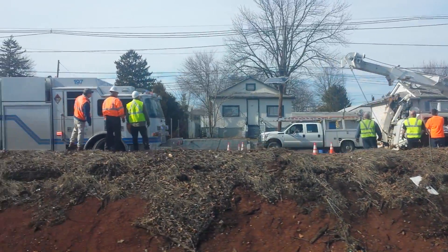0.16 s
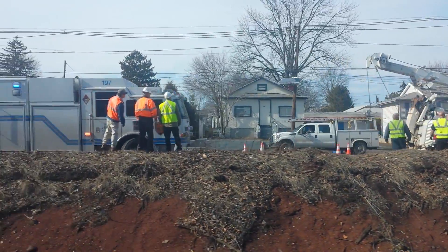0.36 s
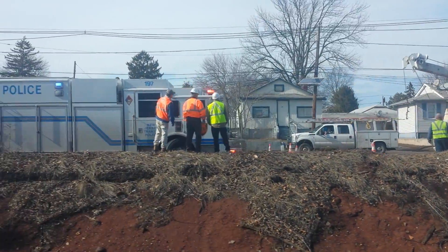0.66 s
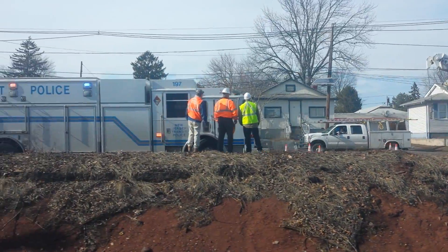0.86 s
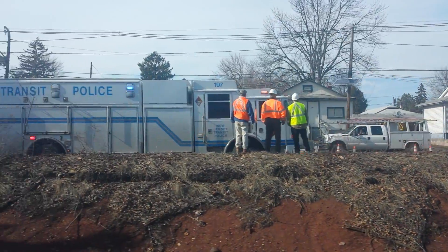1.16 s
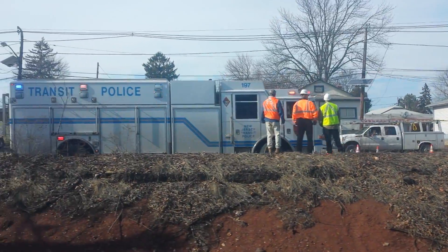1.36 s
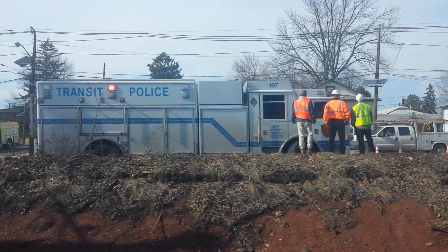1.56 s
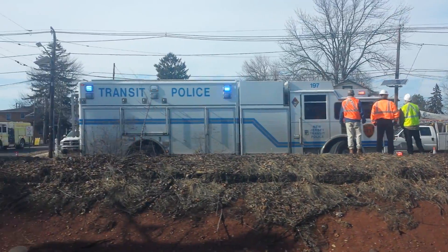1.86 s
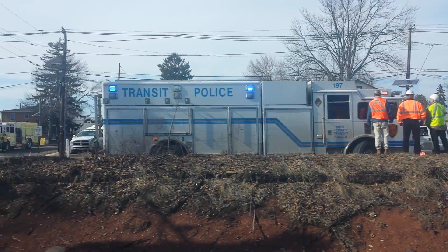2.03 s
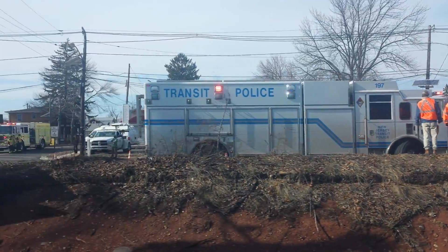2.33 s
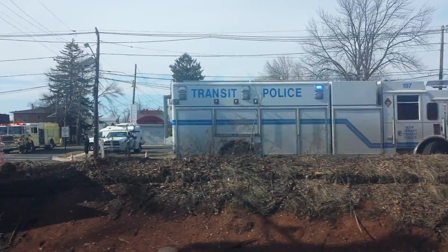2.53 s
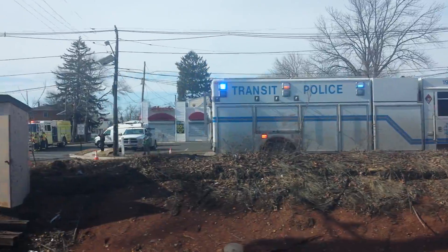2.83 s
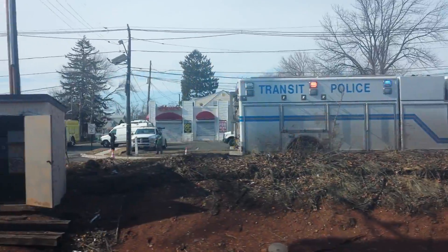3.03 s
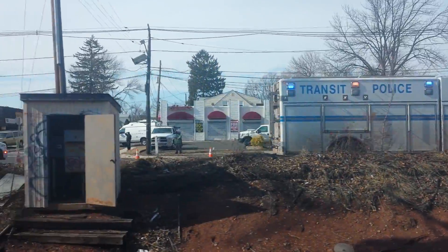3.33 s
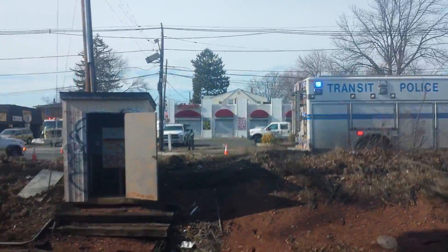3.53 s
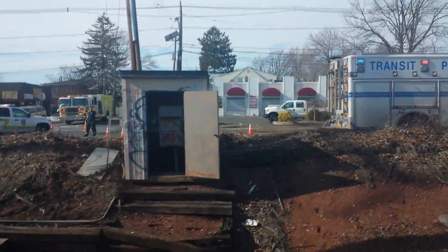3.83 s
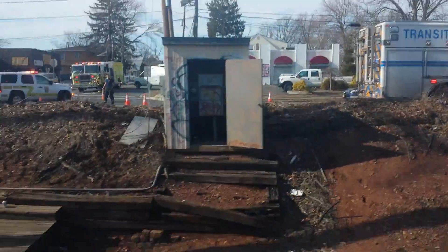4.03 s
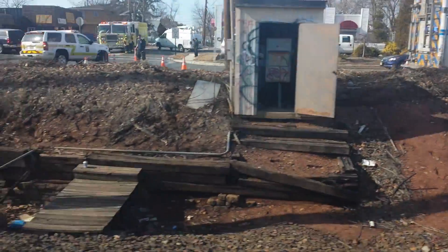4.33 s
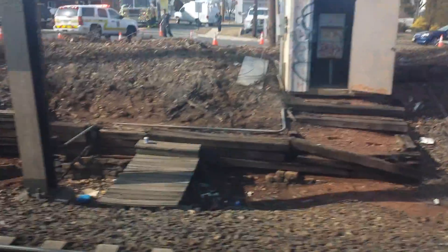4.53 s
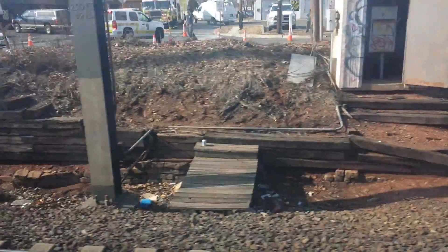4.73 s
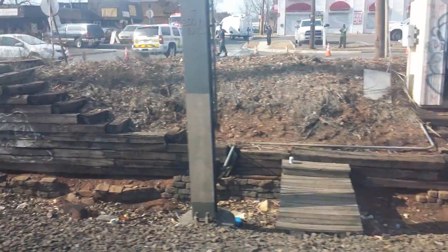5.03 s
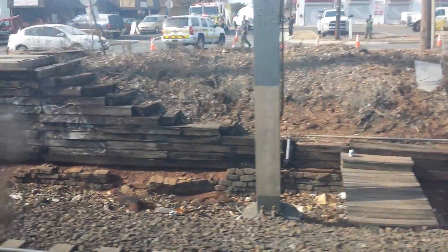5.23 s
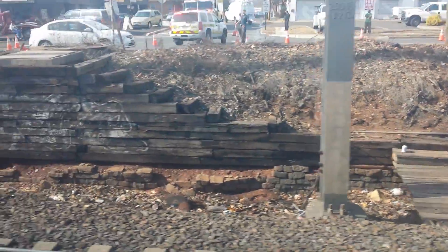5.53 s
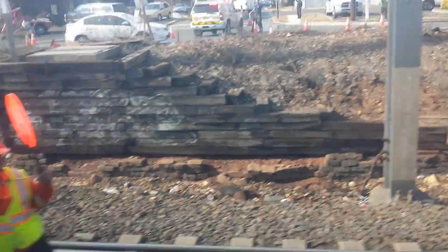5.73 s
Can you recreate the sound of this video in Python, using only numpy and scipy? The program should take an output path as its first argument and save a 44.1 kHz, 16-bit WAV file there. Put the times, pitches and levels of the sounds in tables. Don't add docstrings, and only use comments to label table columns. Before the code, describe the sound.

Deep train-car rumble and droning electrical hum, interrupted by loud phone-case clicks and rubs, the background sinking sharply then returning.

```python
import sys
import numpy as np
from scipy import signal
from scipy.fft import rfft, irfft, next_fast_len
from scipy.io import wavfile
from scipy.ndimage import uniform_filter1d, minimum_filter1d, map_coordinates

SR = 44100
rng = np.random.default_rng(int(sys.argv[2]) if len(sys.argv) > 2 else 0)


def volts_from_db(level):
    exponent = np.asarray(level, float) / 20
    return 10 ** exponent


def transcribe(signal):
    frames = np.atleast_2d(signal).T
    limited = np.clip(frames, -1, 1)
    pcm = np.round(limited * 32767).astype(np.int16)
    wavfile.write(sys.argv[1], SR, pcm)


N = 259292


def unit(x):
    return x / np.sqrt(np.mean(x ** 2) + 1e-20)


def along(points, hz):
    f, v = np.transpose(points)
    return np.interp(np.log(hz + 1), np.log(f + 1), v)


def curve(points):
    s, v = np.transpose(points)
    return np.interp(np.arange(N) / SR, s, v)


def wobble(rate_hz):
    coarse = np.arange(0, N + 64, 64)
    knots = rng.standard_normal(int(N * rate_hz / SR) + 4)
    return np.interp(np.arange(N), coarse, map_coordinates(knots, [coarse * rate_hz / SR]))


def filtered(x, response):
    n = x.shape[-1]
    m = next_fast_len(n + 8192)
    return irfft(rfft(x, m) * response(np.fft.rfftfreq(m, 1 / SR)), m)[..., :n]


def resonances(modes):
    def response(f):
        total = 0
        for k, (center_hz, width_hz, db) in enumerate(modes):
            damping = 1j * f * width_hz
            total = total + (-1) ** k * volts_from_db(db) * damping / (center_hz * center_hz - f * f + damping)
        return total
    return response


def sides(pan_db):
    return volts_from_db([pan_db / 2, -pan_db / 2])


def add(out, start_s, x):
    part = out[:, round(start_s * SR):][:, :x.shape[1]]
    part += x[:, :part.shape[1]]


def turned():
    # time_s, second_grip_share
    turn_points = [(2.5, 0.039), (2.9, 0.57)]
    return np.clip(curve(turn_points), 0, 1)


def gripped(x):
    # freq_hz, left_minus_right_db
    grip_a = [(92, 1.5), (210, 2.5), (420, 4.5), (770, -10.5), (1170, -7), (2740, 4), (6410, 14),
              (11000, -3)]
    # freq_hz, left_minus_right_db
    grip_b = [(60, 2), (160, 4.5), (270, 2), (740, 2.5), (1220, 24), (3330, -3), (5500, 1.5), (12000, -8)]
    first = filtered(x, lambda hz: sides(along(grip_a, hz)))
    second = filtered(x, lambda hz: sides(along(grip_b, hz)))
    return first + turned() * (second - first)


def rush(response, patchy_db):
    # freq_hz, left_right_likeness
    likeness = [(20, 0.9), (120, 1), (240, 0.87), (480, 0.64), (950, 0.6), (1890, 0.41), (3770, -0.02),
                (15000, 0.0)]
    z = signal.stft(rng.standard_normal((2, N)), nperseg=512)[2]
    field = uniform_filter1d(rng.standard_normal(z.shape[1:]), size=6, axis=0)
    field = uniform_filter1d(field, size=12, axis=1)
    pair = signal.istft(z * volts_from_db(patchy_db * unit(field)), nperseg=512)[1][:, :N]

    def mid_side(hz):
        angle = np.arccos(np.clip(along(likeness, hz), -1, 1)) / 2
        return response(hz) * [np.cos(angle), np.sin(angle)]

    mid, side = filtered(pair, mid_side)
    return unit(np.array([mid + side, mid - side]))


def car():
    # time_s, car_level_db
    gain_points = [(0, -21.5), (1.45, -21.5), (2.595, -20.5), (2.63, -29), (2.7, -28), (2.8, -33.5),
                   (3, -35.5), (3.2, -38), (3.33, -40.5), (3.6, -34.5), (4.1, -37.5), (4.4, -34.5),
                   (4.7, -35), (4.9, -32.5), (5.1, -26), (5.3, -26), (5.88, -24.5)]
    full_db = -22
    duck_db = curve(gain_points) - full_db
    low_db, second_db = jolts()
    noise = body(1.054 * duck_db + 0.31 * low_db) + roar(duck_db) + vent(duck_db)
    return volts_from_db(full_db) * gripped(noise) + hum(0.9 * duck_db, low_db, second_db)


def jolts():
    # peak_s, lowest_swell_db, second_swell_db
    bumps = [(0.02, 6.5, 3), (.2, 7.5, 9.5), (.39, 5, 3.5), (.59, -1.5, 6.5), (.72, 4.5, 1.5),
             (.96, 4, 12.5), (1.05, -3.5, 5), (1.18, 6.5, -3.5), (1.36, 5, 11.5), (1.5, 4, 5),
             (1.62, 2.5, 11.5), (1.88, -2, 0), (2.1, -1.5, 5.5), (2.18, 0, 1.5), (2.36, -4, 9.5),
             (2.47, 2.5, 6), (2.95, 1, 6), (3.13, 10.5, 4), (3.65, -15, 5.5), (4.09, 3, -7), (4.29, 5, 3.5),
             (4.55, 4, 0), (4.78, 2, 3), (4.91, 7, 8), (5.03, 3.5, -0.5), (5.11, 4.5, 8.5), (5.47, 8.5, 3),
             (5.57, 1.5, 1), (5.65, 8, 8.5), (5.86, -3, 6.5)]
    s, *swells_db = np.transpose(bumps)
    coarse = np.arange(0, N + 64, 64) / SR
    swells = []
    for db, width_s in zip(swells_db, (0.077, 0.025)):
        bells = np.exp(-0.5 * ((coarse - s[:, None]) / width_s) ** 2)
        swells.append(np.interp(np.arange(N) / SR, coarse, db @ bells))
    return swells


def body(level_db):
    # freq_hz, width_hz, level_db
    body_modes = [(57.4, 23, -11), (87, 9.8, -2.5), (117, 16.2, -4.5), (137.3, 17.6, -2), (160, 14, -16),
                  (206.6, 23, -10.5), (224.2, 32, -16), (298.6, 16, -17), (477, 8.5, -15.5),
                  (532.6, 6, -13)]
    # freq_hz, density_db
    rumble_spectrum = [(13, -30), (24, 2.5), (40, -4.5), (113, 1.5), (191, -4), (278, -15), (367, -23),
                       (880, -120)]
    ringing = volts_from_db(-4.0) * rush(resonances(body_modes), patchy_db=0.65)
    rumble = volts_from_db(-5.5) * rush(lambda hz: volts_from_db(along(rumble_spectrum, hz)), patchy_db=0.4)
    return volts_from_db(level_db) * (ringing + rumble)


def roar(level_db):
    # freq_hz, density_db
    roar_spectrum = [(150, -11), (260, -2), (500, -3), (1300, -15), (1900, -14), (2300, -19), (3500, -21.5),
                     (4500, -47)]
    return volts_from_db(level_db - 10.5) * rush(lambda hz: volts_from_db(along(roar_spectrum, hz)), patchy_db=0.63)


def hum(gain_db, low_db, second_db):
    multiples = [1, 2, 3, 4, 5, 6, 8, 12, 13, 14, 18, 20, 24, 27, 28, 30]
    # grip1_left_db, grip1_right_db, grip2_left_db, grip2_right_db
    levels_db = [(-30, -30, -37, -37.5), (-28, -29.5, -26.5, -27), (-32.5, -34, -32.5, -32),
                 (-40.5, -41.5, -39.5, -40.5), (-42.5, -48, -54, -61), (-46, -36.5, -38, -47.5),
                 (-41, -53.5, -40.5, -43), (-40.5, -33, -47, -49.5), (-51, -38.5, -45, -44.5),
                 (-40.5, -52.5, -45.5, -46), (-51.5, -66, -47, -47), (-34, -32.5, -42, -33.5),
                 (-51, -42.5, -44, -45), (-57, -47, -34, -48), (-51.5, -49, -34.5, -43),
                 (-41, -40.5, -38.5, -49)]
    faint_multiples = [32, 34, 36, 39, 42, 44, 45, 59, 61]
    # freq_hz, left_lead_rad
    lead_a = [(60, -0.3), (180, -0.22), (300, -.5), (480, 0.1), (720, -2), (800, 3), (1200, 1), (1800, 2)]
    # freq_hz, left_lead_rad
    lead_b = [(60, 0.2), (180, -.35), (360, -0.1), (480, .5), (720, -1), (800, 0.9), (1200, 1), (1800, 2.5)]
    mains_hz = 60.09
    out, turn = np.zeros((2, N)), turned()
    phase = 2 * np.pi * mains_hz * np.arange(N) / SR
    shaken_db = {1: low_db, 2: second_db, 3: (low_db - second_db) / 2}
    faint_db = []
    for k in faint_multiples:
        fall_db = 0.42 * (k - faint_multiples[0])
        faint_db.append(-57.5 - fall_db + 7.5 * rng.standard_normal(4))
    for k, grips_db in zip([*multiples, *faint_multiples], [*levels_db, *faint_db]):
        left1, right1, left2, right2 = grips_db
        ports_db = np.array([left1 + turn * (left2 - left1), right1 + turn * (right2 - right1)])
        first_lead, second_lead = along(lead_a, k * mains_hz), along(lead_b, k * mains_hz)
        lead = first_lead + turn * (second_lead - first_lead)
        sway = 12 / (k + 4)
        start = rng.uniform(0, 2 * np.pi) + 0.28 * sway * wobble(8)
        if k in shaken_db:
            swell_db = shaken_db[k] + (2 if k == 1 else 2.5) * wobble(17)
        else:
            swell_db = sway * wobble(4.5)
        tone = np.sin(k * phase + start + [lead, 0 * lead])
        out += np.sqrt(2) * volts_from_db(ports_db + gain_db + swell_db) * tone
    return out


def vent(level_db):
    # freq_hz, density_db
    vent_spectrum = [(2500, -44), (3800, -0.5), (5000, -1.5), (6300, 1.5), (7500, -4), (9000, -7),
                     (11000, -16), (16000, -42)]
    waver_db = 0.55 * wobble(2.38)
    return volts_from_db(level_db + waver_db - 22.5) * rush(lambda hz: volts_from_db(along(vent_spectrum, hz)), patchy_db=0.94)


def clicks():
    # start_s, peak_db, left_minus_right_db, shell_knock_db, shell_edge_db
    snaps = [(2.591, -16, -14, -21, -9), (2.6412, -2.5, 12, -19, -11.5), (2.6587, -19.5, -12, -14.5, -20),
             (2.734, -18, -2, -17, -24), (2.7364, -18, 0, -16, -22), (2.8388, -11, -7, -19, -22),
             (2.859, -14, -31, -23, -15), (2.9818, -14, -12.5, -14, -15), (3.307, -7.5, -10, -21, -4.5),
             (3.464, -8, -17, -25.5, -28), (3.6015, -17, -11, -20.5, -21), (3.9539, -14, -14, -21.5, -15),
             (4.004, -22, 1, -9, -13), (4.043, -8, -13, -32, -12), (5.1001, -3.5, 1.5, -20, -12),
             (5.1421, -18, -5, -8.5, -23), (5.3092, -9.5, -22, -24, -17), (5.6364, -19, -12, -17.5, -18.5)]
    # start_s, peak_db, left_minus_right_db, shell_knock_db
    ticks = [(2.6759, -20.5, -16, -14.5), (2.771, -33.5, -6, -16), (2.825, -30.5, -2, -9),
             (2.8638, -36, -4, -11), (3.1088, -33.5, 7, -20), (3.4659, -22, 6, -16), (3.965, -36, -6, -9),
             (3.991, -40, -4, -3), (4.098, -32, -17, -16), (4.6182, -44, -11, -1), (4.6933, -43, 16, -12),
             (4.712, -38, -8, -3.5), (5.1745, -26.5, -1, -13), (5.4914, -45, 1, -6)]
    # freq_hz, width_hz, level_db
    ports = [
        [(6000, 3100, -1.5), (8000, 3650, -1)],
        [(5870, 3800, 2.5), (10530, 780, -4)],
    ]
    # freq_hz, width_hz, level_db
    shell_modes = [(1310, 1750, 0), (2680, 1720, 0), (11200, 8900, 0)]
    tick_edge_db = -9
    out, t = np.zeros((2, N)), np.arange(1024) / SR
    for start_s, db, pan_db, knock_db, edge_db in [*snaps, *[(*tick, tick_edge_db) for tick in ticks]]:
        burst = 0.36 * rng.standard_normal((2, len(t))) * volts_from_db(-60 * t / 0.0044)
        burst[:, 0] = 1.33
        cavities = []
        for side, port in zip(burst, ports):
            cavities.append(filtered(filtered(side, resonances(port)), resonances(port)))
        parts = [np.array(cavities)]
        for mode in shell_modes:
            parts.append(filtered(filtered(burst, resonances([mode])), resonances([mode])))
        parts_db = [-7, knock_db - 0.5, knock_db - 1, edge_db]
        snap = sum(volts_from_db(d) * p / np.abs(p).max(1, keepdims=True) for d, p in zip(parts_db, parts))
        pan = sides(pan_db)
        add(out, start_s + 0.0005, volts_from_db(db + 9) * (pan / pan.mean())[:, None] * snap)
    return out


def pop():
    # start_s, level_db, pitch_hz, left_minus_right_db
    unstickings = [
        (2.83705, -4.5, 900, -14),
    ]
    out, t = np.zeros((2, N)), np.arange(512) / SR
    for start_s, db, hz, pan_db in unstickings:
        shape = volts_from_db(-60 * (hz * t / 2.4) ** 2) * (1 - np.exp(-t / 0.0001))
        cycle = np.sin(2 * np.pi * (hz * t) ** 0.8) * shape
        add(out, start_s, -volts_from_db([[db + pan_db], [db]]) * cycle)
    return out


def rubs():
    # start_s, length_s, level_db, left_minus_right_db, center_hz
    slides = [(1.379, 0.13, -51, 16, 7500), (2.158, 0.18, -46, 16, 7240), (2.397, 0.26, -53, 2, 6400),
              (2.716, 0.037, -46, -10, 6000), (2.89, 0.019, -47, 4, 8000), (3.24, 0.13, -57.5, -4, 8000),
              (3.465, .035, -54, 8, 8000), (3.606, 0.12, -53.5, -12.5, 8500), (3.669, 0.36, -55, -5, 8000),
              (3.935, 0.055, -48, -7, 8000), (4.698, 0.055, -63, -10, 4000), (4.902, 0.12, -68, -14, 6000),
              (5.113, .11, -68, 5, 9000), (5.618, 0.031, -47.5, -4, 8000), (5.638, 0.19, -55.5, -11, 10000),
              (5.795, 0.099, -50.5, 8, 9000)]
    # start_s, length_s, level_db, left_minus_right_db, center_hz
    squeaks = [
        (2.186, 0.093, -48.5, 24, 6750),
        (2.305, 0.38, -49.5, 15, 1700),
        (3.632, .061, -54, 14, 6000),
    ]
    slide_width, squeak_width = 0.53, 0.092
    left_dull_hz = 9300
    out = np.zeros((2, N))
    for start_s, length_s, db, pan_db, hz, width in [*[(*r, slide_width) for r in slides],
                                                     *[(*r, squeak_width) for r in squeaks]]:
        n = round(length_s * SR)
        grains = rng.standard_normal((2, n)) * volts_from_db(0.7 * rng.standard_normal((2, n)))

        def band(f):
            return np.exp(-0.5 * (np.log((f + 1) / hz) / width) ** 2) / (1 + (f / 12500) ** 8)

        hiss = unit(filtered(grains, band))
        hiss[0] = filtered(hiss[0], lambda f: 1 / (1 + (f / left_dull_hz) ** 8))
        shape = signal.windows.tukey(n, 0.55) * volts_from_db(0.6 * wobble(39)[:n])
        add(out, start_s, volts_from_db(db + 4) * sides(pan_db)[:, None] * shape * hiss)
    return out


def scuff():
    # start_s, level_db, t60_s, left_minus_right_db
    brushes = [
        (4.393, -36, 0.21, 7),
    ]
    # freq_hz, width_hz, level_db
    panel_modes = [(1140, 280, -2.5), (1700, 230, 4.5), (2230, 290, -1.5), (3400, 470, -4),
                   (5500, 680, -8.5), (7500, 3100, -15)]
    out, t = np.zeros((2, N)), np.arange(SR // 3) / SR
    for start_s, db, t60_s, pan_db in brushes:
        noise = rng.standard_normal((2, len(t)))
        brush = unit(filtered(noise, lambda f: resonances(panel_modes)(f) / (1 + (f / 10000) ** 6)))
        decay_db = -60 * (t / t60_s) ** 2
        shape = volts_from_db(db + decay_db + wobble(95)[:len(t)]) * (1 - np.exp(-t / 0.0015))
        add(out, start_s, shape * sides(pan_db)[:, None] * brush)
    return out


def whine():
    # start_s, length_s, level_db
    whines = [(2.48, 0.12, -62), (2.62, 0.44, -72), (5.246, 0.18, -60), (5.42, 0.096, -68),
              (5.577, 0.046, -62)]
    out = np.zeros((2, N))
    for start_s, length_s, db in whines:
        n = round(length_s * SR)
        tone = unit(filtered(rng.standard_normal(n), lambda f: resonances([(14050, 120, 0)])(f) ** 2))
        add(out, start_s, volts_from_db([[db - 37], [db]]) * signal.windows.tukey(n, 0.3) * tone)
    return out


def starved(x, margin_db, from_hz=8300):
    hz, _, z = signal.stft(x, SR, nperseg=2048)
    power = np.abs(z) ** 2
    bands = np.repeat(power[:, :1024].reshape(2, 128, 8, -1).mean(2), 8, axis=1)
    treble = power[:, (hz > 2000) & (hz < 9000)].mean(1, keepdims=True)
    top = power[:, hz > 10000].mean((0, 1))[None]
    snap = top > 10 * minimum_filter1d(top, size=5)
    keep = (bands > treble * volts_from_db(2 * margin_db)) | (hz[:1024, None] < from_hz) | snap
    return signal.istft(z * np.pad(keep, ((0, 0), (0, 1), (0, 0))), nperseg=2048)[1][:, :N]


def scene():
    return car() + clicks() + pop() + rubs() + scuff() + whine()


def roll_off(x):
    return signal.sosfilt(signal.butter(12, 16060, fs=SR, output="sos"), x)


def record(dry):
    # freq_hz, gain_db
    top_end = [(20, 0), (13800, -1), (14600, -1.5), (15000, -23), (16000, -24), (17000, -55.5)]
    x = filtered(dry, lambda hz: (1j * hz / (35 + 1j * hz)) ** 2 * volts_from_db(along(top_end, hz)))
    x = starved(x, margin_db=np.array([[[-13]], [[-11.5]]]))
    x = x / (1 + np.abs(x / 0.9) ** 6) ** (1 / 6)
    return roll_off(x)


dry = scene()
out = record(dry)
transcribe(out)
```